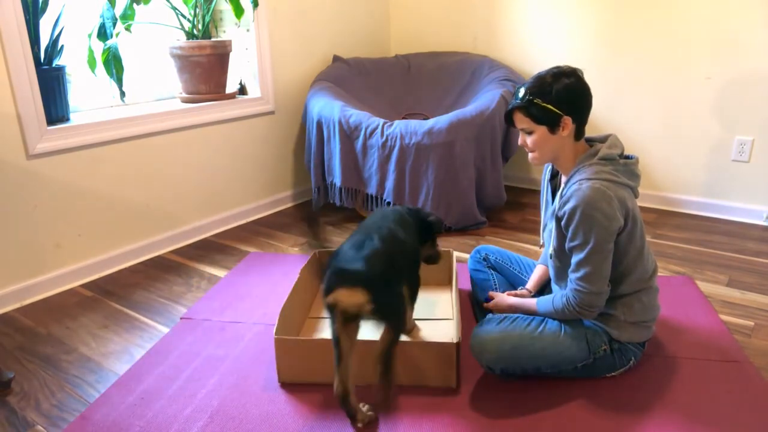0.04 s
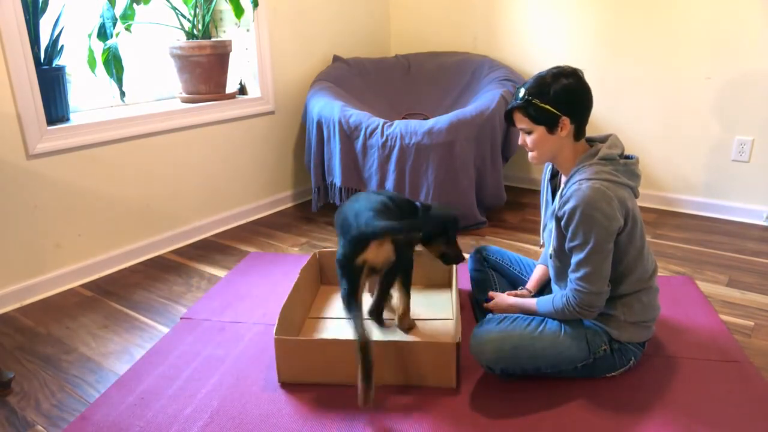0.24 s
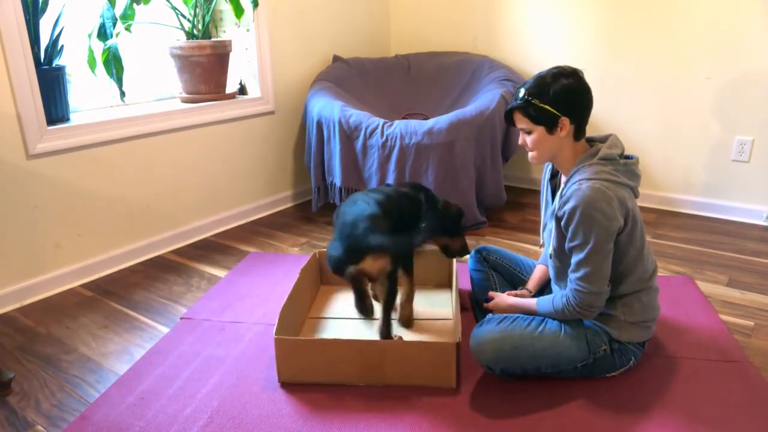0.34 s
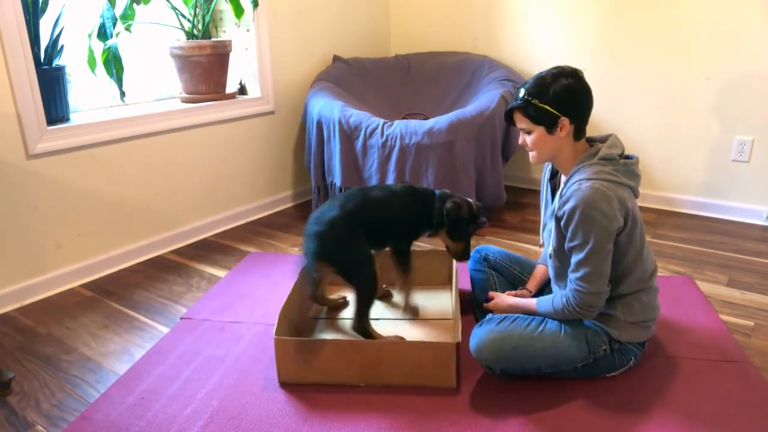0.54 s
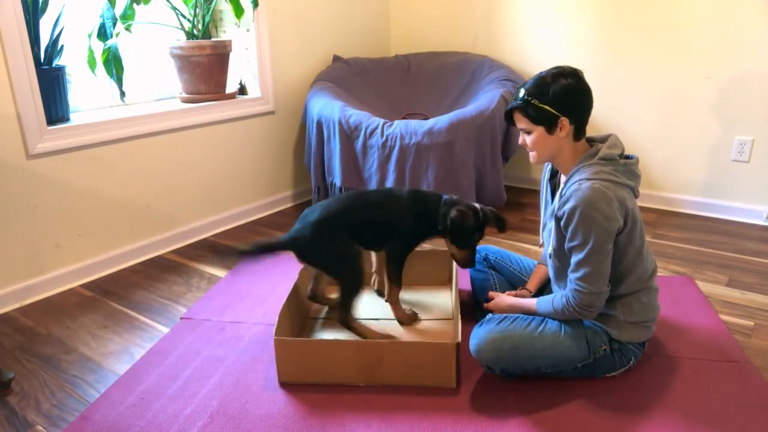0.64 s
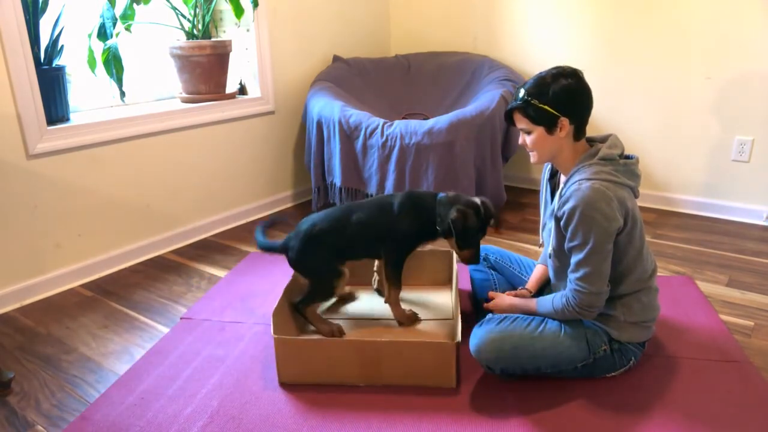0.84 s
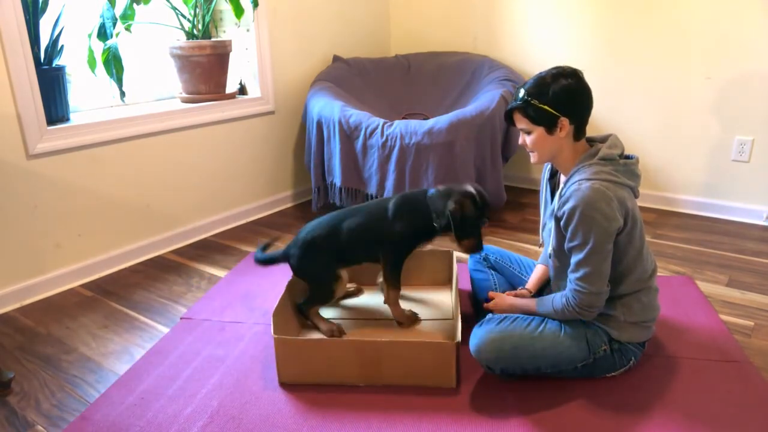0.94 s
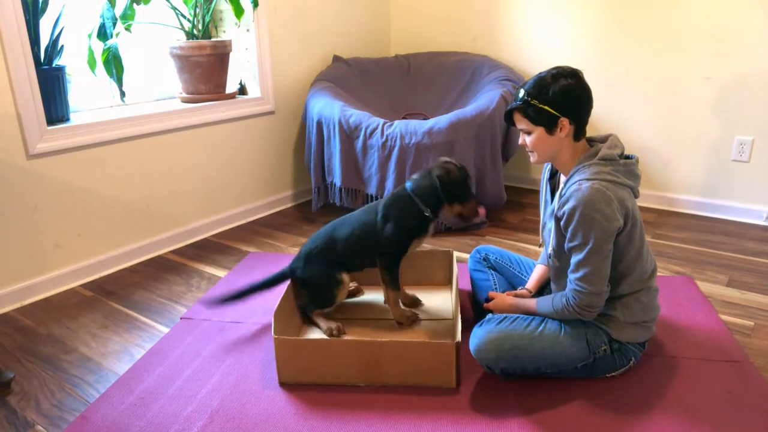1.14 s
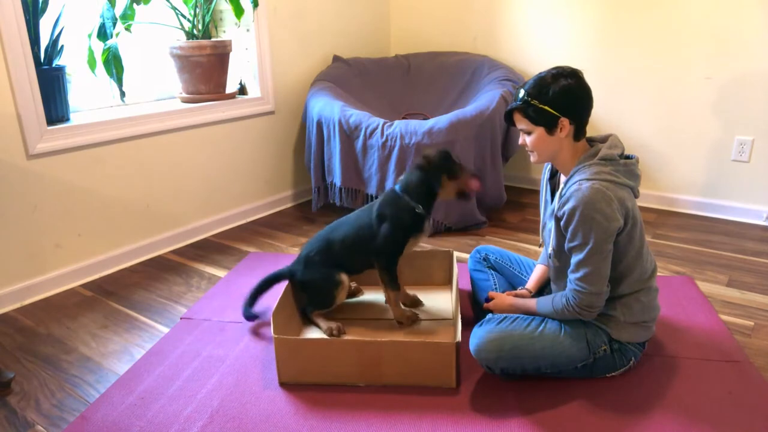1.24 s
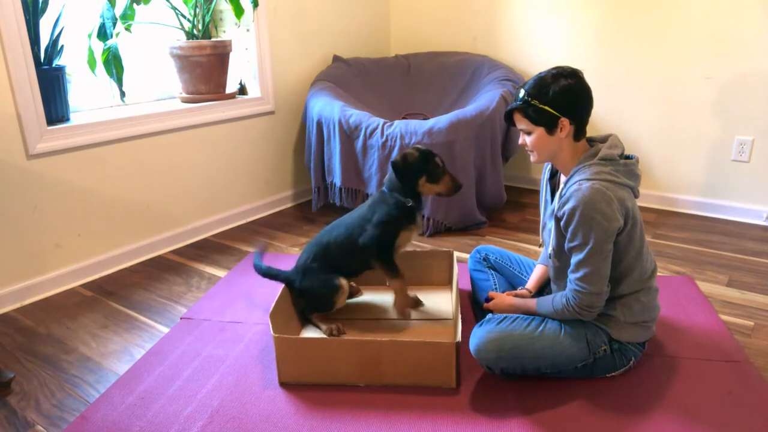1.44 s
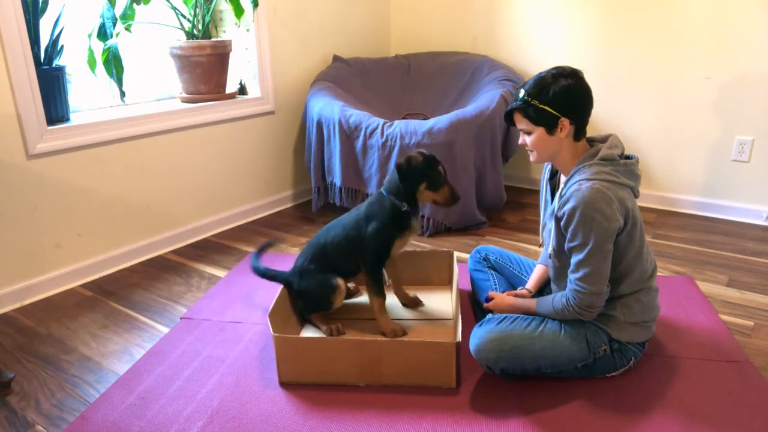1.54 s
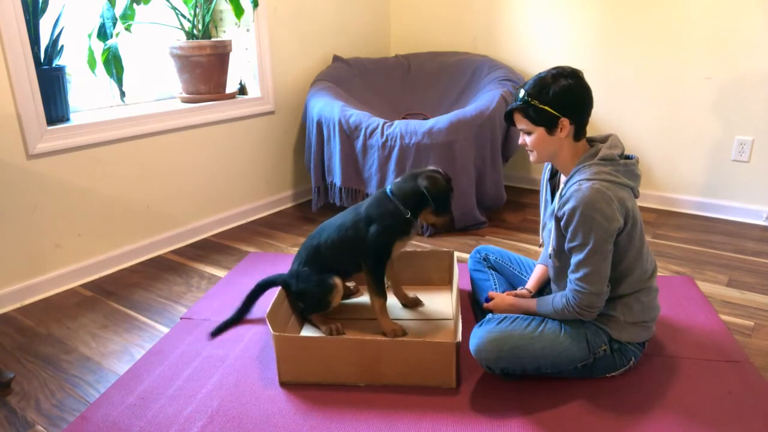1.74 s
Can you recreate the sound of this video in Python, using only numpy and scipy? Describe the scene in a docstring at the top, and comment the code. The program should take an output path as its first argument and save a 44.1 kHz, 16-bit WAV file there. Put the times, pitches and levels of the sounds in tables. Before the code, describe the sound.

A dog climbs into a shallow cardboard box, heard from a few metres away in a bare, lively room. Hollow pad thumps cluster at 0.2-0.4 seconds, with a sharp claw tick near 0.34. Lighter rattly knocks and scuffs come around 0.6, then the heaviest thump and floor boom at 0.8. Softer taps follow near 1.15 and 1.54, fading into faint hush.

```python
"""Soft thumps, ticks and scuffs: a dog climbs into a shallow cardboard box on a mat, turns and sits.
It is a few metres from the microphone, in a bare, lively room with a faint steady hush.
Pads thump the box's decaying modes; ticks and knocks snap and ring briefly; scuffs are gritty noise.
Floorboard modes boom under the weight. Diffuse echoes smear the thumps, taps and scuffs."""
import sys
import numpy as np
from scipy import signal
from scipy.fft import rfft, irfft, next_fast_len
from scipy.io import wavfile

SR = 44100
rng = np.random.default_rng(int(sys.argv[2]) if len(sys.argv) > 2 else 0)


def to_wav(s):
    """Save 16-bit WAV."""
    ch = np.atleast_2d(s).T  # columns
    pcm = np.round(np.clip(ch, -1, 1) * 32767)  # PCM
    wavfile.write(sys.argv[1], SR, pcm.astype(np.int16))


def level_to_linear(level):
    """Convert decibel levels to linear amplitude factors, elementwise."""
    exponent = np.asarray(level, float) / 20
    return 10 ** exponent


N = 79380

# Modes of the box and the air in it. Each row: frequency in Hz, relative level in dB, T60 in seconds.
BOX_MODES = [(114, 0.5, 0.11), (156.4, -6.5, 0.17), (197, 1, .11), (237, -1, .14), (268, 0, .1),
             (335, -1, .09), (385, -6, .07), (438, -3, .08), (539, -18.5, 0.16), (731, -2.5, 0.028),
             (832, -8, 0.037), (947, -3.5, 0.02), (1065, -5, 0.029), (1200, -8, 0.018), (1400, -2, 0.029),
             (1643, -0.5, 0.022), (1866, -3.5, 0.041), (2120, -5, 0.043), (2450, -25, 0.01),
             (2920, -14, 0.014)]
# Blows on the card. Each row: start in seconds, drive in dB, frequency of the modes driven most in Hz,
# spread around it in octaves, time constant in seconds for the pad to sink in.
BLOWS = [(-.03, -37, 556, 0.79, 0.0067), (0.114, -35, 387, 0.24, 0.023), (0.2192, -29, 438, 0.19, 0.002),
         (0.2296, -32.5, 340, 0.22, 0.0012), (0.224, -34.5, 165, 0.47, 0.0046),
         (.3365, -31.5, 268, 0.14, 0.00097), (.3435, -30.5, 252, 0.31, 0.00093),
         (.41, -36.5, 273, 0.1, 0.018), (0.338, -58, 850, 0.33, 0.0062), (.338, -35, 131, 0.22, 0.0051),
         (0.553, -43, 1300, 0.71, 0.0011), (.571, -37, 323, 0.14, 0.0038),
         (0.5873, -38, 1250, 0.42, 0.00022), (.598, -32.5, 1040, 0.32, 0.0015),
         (.611, -41.5, 920, 0.54, 0.0003), (0.61, -34.5, 316, 0.3, 0.0061),
         (.635, -42.5, 800, 0.91, 0.0019), (0.786, -28, 1400, 0.3, 0.0048), (.8155, -32.5, 260, 0.5, 0.001),
         (.8215, -29, 200, 0.28, 0.001), (.818, -29, 720, 0.17, .002), (0.808, -35, 325, 0.56, 0.0021),
         (.845, -35.5, 254, 0.65, 0.006), (0.889, -32.5, 240, 0.1, 0.011), (0.924, -57, 910, 1, 0.0038),
         (1.15, -43, 1180, 0.88, 0.00056), (1.16, -41.5, 830, 0.27, 0.001),
         (1.161, -50.5, 168, 0.49, 0.0023), (1.457, -41.5, 716, 0.081, 0.0013),
         (1.44, -45.5, 314, 0.17, 0.012), (1.543, -35.5, 553, 0.27, 0.0011),
         (1.5523, -52, 1520, 0.23, 0.0002), (1.544, -39.5, 337, 0.37, 0.0039),
         (1.545, -46.5, 146, 0.36, 0.0042)]
# Claw ticks and lower, duller knocks. Each row: time in seconds, level of the ring in dB, frequency in Hz.
TAPS = [(.2186, -31, 4700), (.3355, -20.5, 4800), (.5880, -33, 3500), (.5885, -30.5, 1150),
        (.7955, -33, 4300), (.8075, -28, 1900), (1.1515, -35, 4000), (1.2545, -45, 4300),
        (1.5398, -36, 1500), (1.5420, -37, 1000), (.2185, -34, 2600), (.3265, -31, 1500),
        (.3340, -29, 1100), (.3372, -29, 1800), (.3420, -32, 800), (.5900, -35, 1750), (.6030, -35, 1050),
        (.6125, -33, 1750), (.8125, -29, 1750), (.8465, -34, 2100), (1.1565, -41, 1250),
        (1.1630, -38, 2050), (1.1970, -41, 1200), (1.2120, -41, 1400), (1.5405, -47, 3800),
        (1.7620, -42, 3700), (1.7621, -43, 5200)]
# Scuffs of pads and fur. Each row: start in seconds, attack in seconds, hold in seconds,
# rms level in dB before the envelope, extra tilt in dB per octave.
SCUFFS = [(-.05, 0.008, 0.069, -50.5, -4), (0.2135, 0.0045, 0.039, -47, -0.5),
          (0.325, 0.00047, 0.015, -41, -2.5), (0.333, 0.0025, 0.085, -51, -0.5),
          (0.5498, 0.00096, 0.054, -50.5, 2), (0.581, 0.0037, 0.066, -53.5, -1.5),
          (0.65, 0.029, 0.056, -54, 0.9), (0.756, .012, .002, -54, 0), (0.776, 0.00091, 0.028, -43, 3),
          (0.803, 0.0086, 0.0094, -35, -4), (0.849, 0.0062, 0.061, -47.5, 1.15),
          (0.901, 0.025, 0.062, -49, -1.5), (1.033, 0.0071, 0.12, -55.5, -1),
          (1.146, 0.0057, 0.033, -58, -2), (1.183, 0.015, 0.067, -57.5, -2.5),
          (1.34, 0.0066, 0.045, -67.5, 4), (1.386, 0.012, 0.097, -66, 0), (1.541, 0.001, 0.0072, -49.5, -2),
          (1.739, 0.0028, 0.012, -75.5, 12)]
# Basic tone of a scuff before its tilt. Each row: frequency in Hz, relative density in dB per Hz.
SCUFF_TONE = [(90, -6), (200, -8), (300, -8), (791, -6), (935, -7), (2350, -9.5), (3070, -12),
              (11300, -17.5), (15300, -24.5), (16300, -52)]
# Weight landing on the floorboards. Each row: start in seconds, drive in dB, rise time constant in seconds.
LANDINGS = [(.11, -74, 0.018), (0.239, -46, 0.042), (0.337, -50, 0.016), (0.604, -51.5, 0.0081),
            (0.683, -66, 0.018), (0.819, -30, 0.035), (1.083, -50, 0.0029), (1.58, -71, 0.036)]
# Modes of the floorboards. Each row: frequency in Hz, relative level in dB, T60 in seconds.
BOARD_MODES = [(61.9, -5.5, 0.41), (47.4, -18, 0.29), (84, -16, 0.15)]
# How long the room rings. Each row: frequency in Hz, T60 in seconds.
ROOM_T60 = [(150, .35), (350, .4), (700, .5), (1500, .5), (4000, .42), (9000, .36), (15000, .26)]
# Tone of the steady hush. Each row: frequency in Hz, relative density in dB per Hz.
HUSH_TONE = [(21, -28), (35, 4), (217, -1.5), (345, 5), (608, -3), (1310, 3.5), (2630, -5.5), (4510, -6),
             (6640, -10), (11700, -23.5), (15100, -24), (16300, -28)]

DETUNE = 0.032  # largest random fractional shift of the modes, drawn anew for each blow
BOX_BASS_CUT_HZ = 96  # a small box radiates little bass
RATTLE_ABOVE_HZ = 600  # only the light upper modes follow the rebounds
RATTLE_SIZE, RATTLE_S = 0.45, 0.02  # largest rebound relative to the blow, span of the rebounds
TAP_CYCLES, TAP_SNAP_DB = 12, -12  # cycles until the ring is 60 dB down, snap relative to the ring
SCUFF_GRIT_DB, SCUFF_RELEASE_S = 2.4, 0.011  # mean random boost of each click, release time constant
ROOM_DB, ROOM_GAP_S, ROOM_BASS_CUT_HZ = -3.5, 0.007, 270
ROOM_REDRAW_S = 0.12  # seconds between fresh random echo patterns
HUSH_DB = -63  # rms ahead of the microphone
MIC_BASS_CUT_HZ = 38.5

LEAD = SR // 10  # samples of run-up, so that sounds may begin before time zero
SIZE = next_fast_len(N + LEAD + SR)
T = (np.arange(SIZE) - LEAD) / SR
HZ = np.maximum(np.fft.rfftfreq(SIZE, 1 / SR), 1)


def unit(x):
    """Scale to rms 1."""
    return x / np.sqrt(np.mean(x ** 2))


def curve(table):
    """Join the table's second column by straight lines over log frequency."""
    hz, value = np.array(table).T
    return np.interp(np.log(HZ), np.log(hz), value)


def ring(x, hz, t60):
    """One decaying mode; an impulse of 1 rings with a peak near 1."""
    pole = np.exp(2j * np.pi * hz / SR - np.log(1000) / (t60 * SR))
    return signal.lfilter([1], [1, -pole], x).imag


def impulse(s):
    """An impulse at s seconds, shared between two samples."""
    return np.maximum(1 - np.abs(T - s) * SR, 0)


def high_pass(x, order, hz):
    """Butterworth bass cut."""
    return signal.sosfilt(signal.butter(order, hz, "high", fs=SR, output="sos"), x)


def blows():
    """The spot struck chooses which modes answer; the loose card rattles with a few quick rebounds."""
    out = np.zeros(SIZE)
    t = np.arange(SR // 2) / SR
    hz, mode_db, t60 = np.array(BOX_MODES).T[:, :, None]
    light = hz[:, 0] > RATTLE_ABOVE_HZ
    # neighbouring upper modes start in opposite senses
    sides = np.where(light, (-1.) ** np.arange(len(BOX_MODES)), 1)[:, None]
    chance = rng.random((len(BLOWS), 3, len(BOX_MODES), 1))
    for (s, db, centre_hz, spread, sink), (tune, when, size) in zip(BLOWS, chance):
        decay = level_to_linear(db + mode_db - 60 * t / t60)
        share = np.exp(-.5 * (np.log2(hz / centre_hz) / spread) ** 2)
        shifted_hz = hz * (1 + DETUNE * (2 * tune - 1))
        soft_start = 1 - np.exp(-t / sink)
        rings = decay * share * sides * np.sin(2 * np.pi * shifted_hz * t) * soft_start
        rebounds = np.zeros(len(t))
        rebound_at = (when[:5, 0] * RATTLE_S * SR).astype(int)
        rebounds[rebound_at] = RATTLE_SIZE * (2 * size[:5, 0] - 1)
        rattle = signal.fftconvolve(rings[light].sum(axis=0), rebounds)[:len(t)]
        start = LEAD + int(s * SR)
        out[start:start + len(t)] += rings.sum(axis=0) + rattle
    return high_pass(out, 4, BOX_BASS_CUT_HZ)


def taps():
    """Claw ticks and lower, duller knocks: each a wide snap and a very short ring."""
    out = np.zeros(SIZE)
    for s, db, hz in TAPS:
        tap = impulse(s)
        snap = level_to_linear(TAP_SNAP_DB) * np.gradient(tap)
        out += level_to_linear(db) * (ring(tap, hz, TAP_CYCLES / hz) + snap)
    return out


def scuffs():
    """Dense uneven fibre clicks while a pad slides."""
    boost = level_to_linear(SCUFF_GRIT_DB * rng.exponential(size=SIZE))
    grit = rfft(rng.standard_normal(SIZE) * boost)
    out = np.zeros(SIZE)
    for s, attack, hold, db, tilt_db in SCUFFS:
        swell = np.clip((T - s) / attack, 0, 1)
        release = np.exp(-np.maximum(T - s - attack - hold, 0) / SCUFF_RELEASE_S)
        # the tilt is flat below 500 Hz
        tone_db = curve(SCUFF_TONE) + tilt_db * np.log2(np.maximum(HZ, 500) / 4000)
        out += level_to_linear(db) * swell * release * unit(irfft(grit * level_to_linear(tone_db), SIZE))
    return out


def booms():
    """One impulse rings the boards; the boom swells in over the rise time."""
    out = np.zeros(SIZE)
    for s, db, rise in LANDINGS:
        strike = impulse(s)
        swing = sum(level_to_linear(mode_db) * ring(strike, hz, t60) for hz, mode_db, t60 in BOARD_MODES)
        out += level_to_linear(db) * swing * (1 - np.exp(-np.maximum(T - s, 0) / rise))
    return out


def room(x):
    """Diffuse echoes, each band fading at its own rate; a new random echo pattern is drawn at each step."""
    size = SR
    t = np.arange(size) / SR
    hz = np.maximum(np.fft.rfftfreq(size, 1 / SR), 1)
    centres = 100 * 2 ** np.arange(0, 7.6, .5)
    t60 = np.interp(centres, HZ, curve(ROOM_T60))[:, None]
    # silent for one gap, then swelling in over another
    fades = level_to_linear(-60 * t / t60) * np.clip(t / ROOM_GAP_S - 1, 0, 1)
    bands = np.maximum(1 - 2 * np.abs(np.log2(hz / centres[:, None])), 0)
    bands = bands / np.sqrt(1 + (ROOM_BASS_CUT_HZ / hz) ** 4)
    step = int(ROOM_REDRAW_S * SR)
    out = np.zeros(SIZE + size)
    for start in range(0, LEAD + N, step):
        noise = rfft(rng.standard_normal(size))
        tail = np.sum(irfft(noise * bands, size) * fades, axis=0)
        tail = tail / np.sqrt(np.sum(tail ** 2))
        echo = signal.fftconvolve(x[start:start + step], tail)
        out[start:start + len(echo)] += echo
    return level_to_linear(ROOM_DB) * out[:SIZE]


def hush():
    """Steady room air and microphone hiss, as shaped noise."""
    noise = rfft(rng.standard_normal(SIZE))
    return level_to_linear(HUSH_DB) * unit(irfft(noise * level_to_linear(curve(HUSH_TONE)), SIZE))


def scene():
    """Dog and box, heard directly and through the room, over the floorboards and the hush."""
    dog = blows() + taps() + scuffs()
    mix = dog + room(dog) + booms() + hush()
    return mix[None, LEAD:LEAD + N]


def top_cut(x):
    """Nothing passes above the cut-off."""
    return signal.sosfilt(signal.butter(12, 16480, fs=SR, output="sos"), x)


def record(dry):
    """The microphone drops the deepest bass."""
    finished = high_pass(dry, 3, MIC_BASS_CUT_HZ)
    return top_cut(finished)


dry = scene()
out = record(dry)
to_wav(out)
```